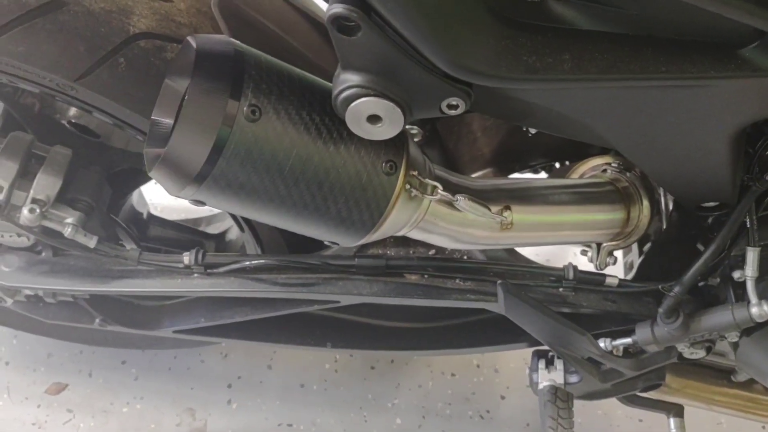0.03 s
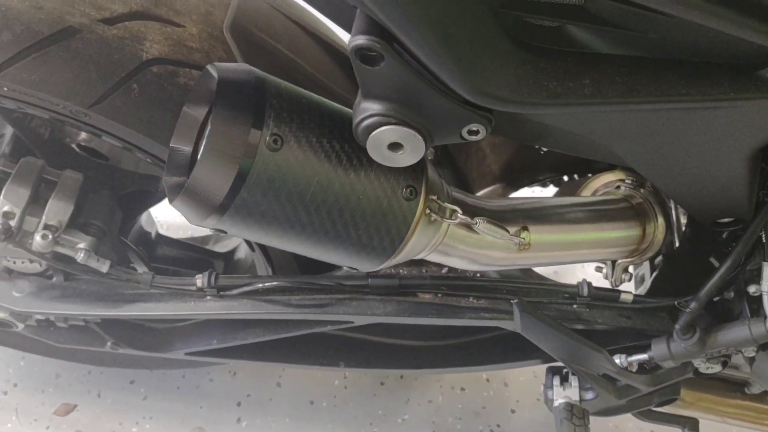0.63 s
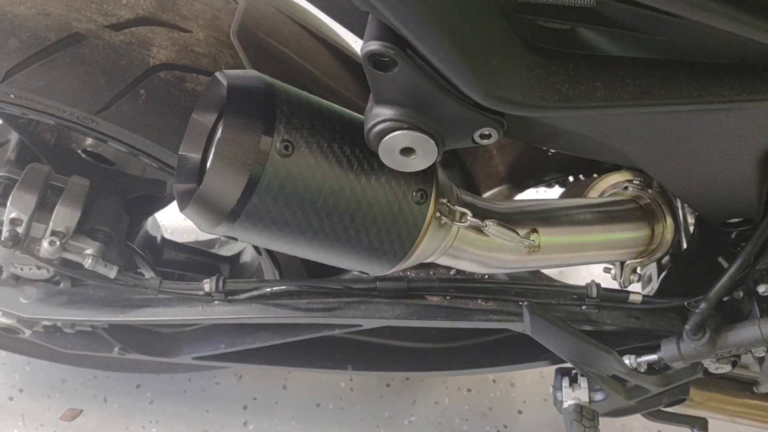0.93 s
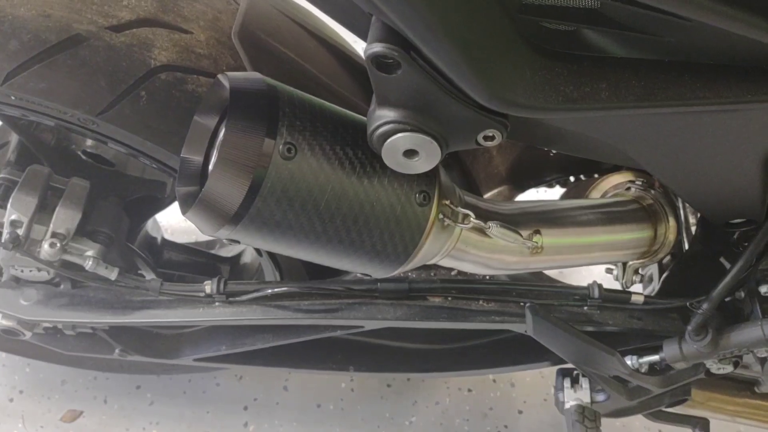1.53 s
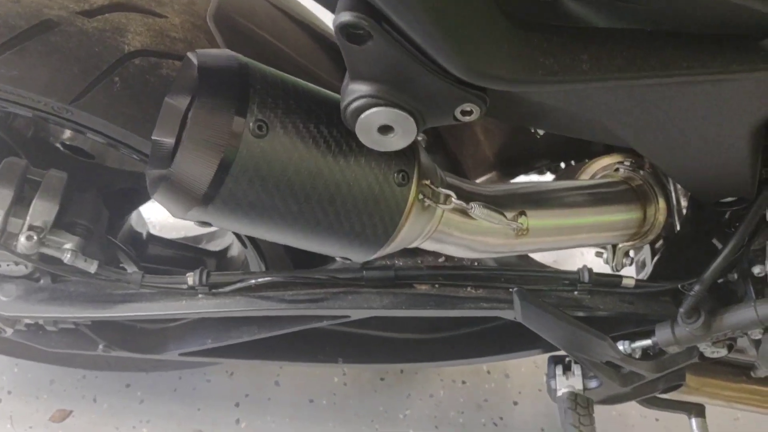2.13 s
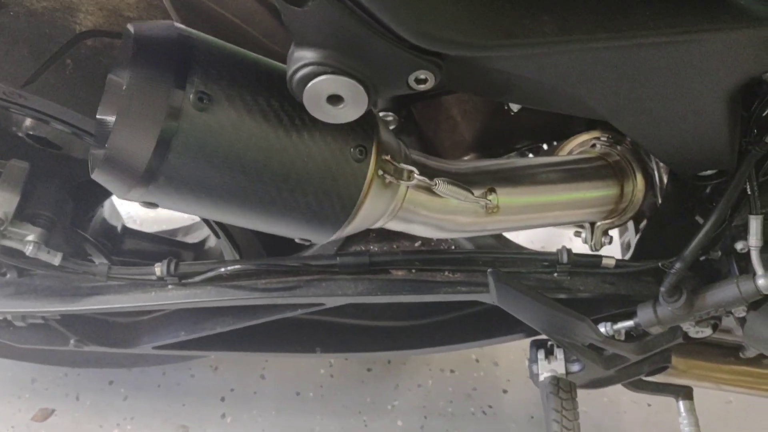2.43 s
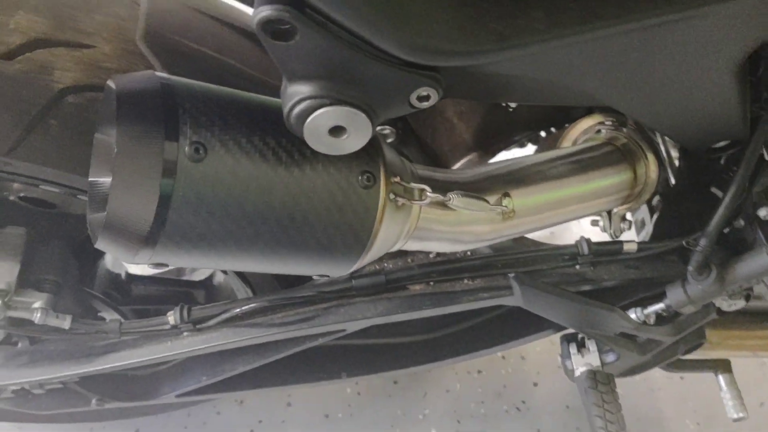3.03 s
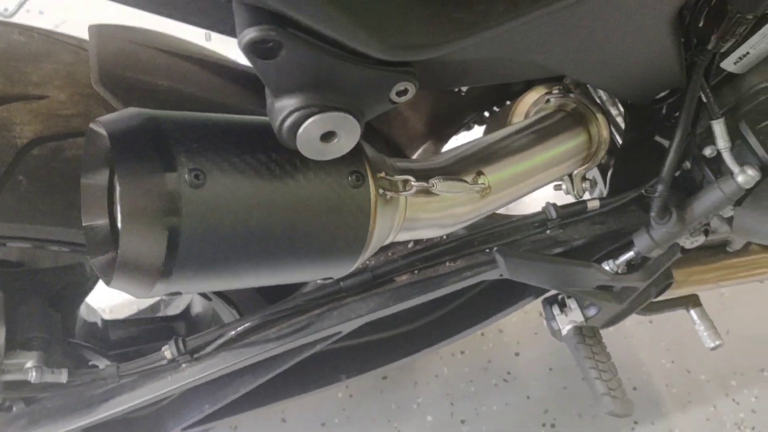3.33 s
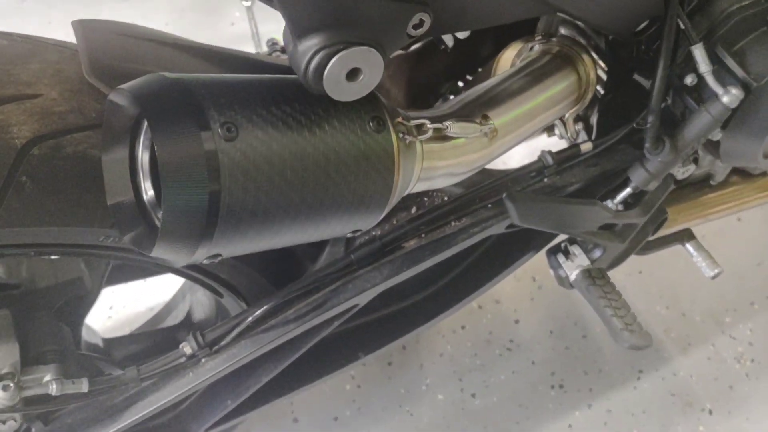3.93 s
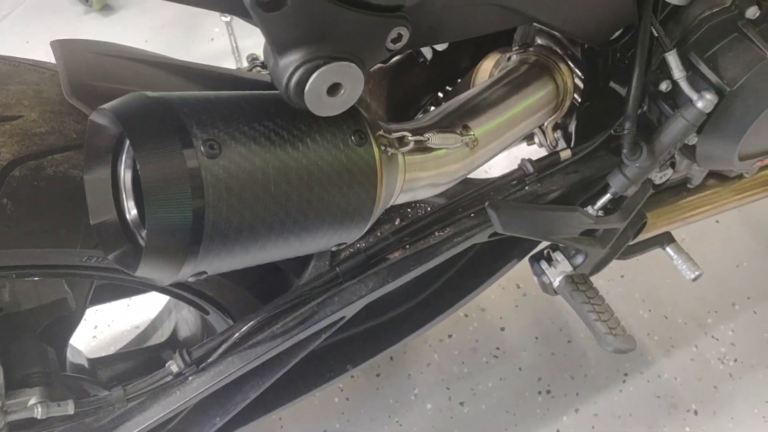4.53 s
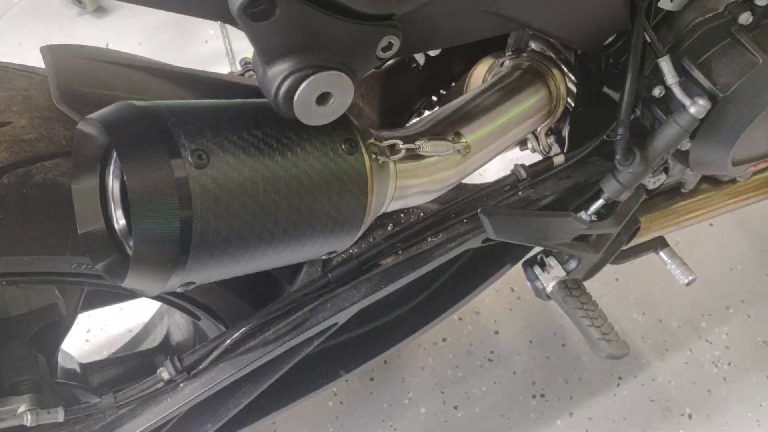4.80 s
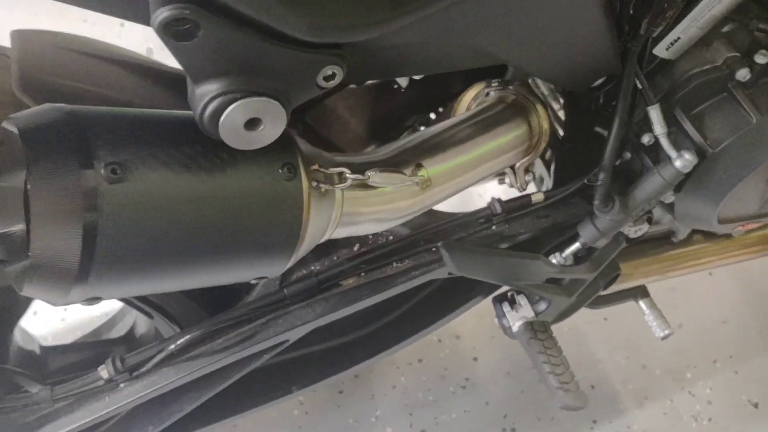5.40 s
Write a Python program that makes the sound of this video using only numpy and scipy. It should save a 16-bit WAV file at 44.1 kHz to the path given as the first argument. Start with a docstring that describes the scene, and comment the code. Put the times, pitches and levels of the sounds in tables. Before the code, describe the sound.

A twin-cylinder motorcycle idles in a garage with a low, uneven rumble, gets two quick throttle blips, then settles back.

```python
"""In a garage, a twin-cylinder motorcycle idles and gets two small throttle blips.
Unevenly spaced firings excite the modes of the exhaust pipe; revved, they crack and merge into a note.
Unburnt fuel pops, turbulent intake air rushes, and the moving parts hiss, tick, rattle and ping.
The walls reverberate. A close microphone swings from the engine towards the tip of the short
silencer and rounds off the loudest peaks."""
import sys
import numpy as np
from scipy import signal
from scipy.fft import rfft, irfft, next_fast_len
from scipy.io import wavfile
from scipy.ndimage import uniform_filter1d, map_coordinates

SR = 44100
rng = np.random.default_rng(int(sys.argv[2]) if len(sys.argv) > 2 else 0)


def bounce(signal):
    """Save signal as a 16-bit WAV file at the path given by the first command-line argument."""
    frames = np.transpose(np.atleast_2d(signal))
    limited = np.clip(frames, -1, 1)
    pcm = np.round(limited * 32767).astype(np.int16)
    wavfile.write(sys.argv[1], SR, pcm)


N = 245195
TIME = np.arange(N) / SR

# The band the silencer's chamber cancels. Each row: centre in Hz, width in Hz, share cancelled in dB.
CHAMBER_NOTCH = [(90.7, 16, -2)]


def amp(db):
    """Decibels as an amplitude ratio."""
    return 10 ** (np.asarray(db) / 20)


def unit(x):
    """Normalisation to rms 1."""
    return x / np.sqrt(np.mean(x ** 2) + 1e-20)


def steady(x):
    """Normalisation to rms 1 over a few engine cycles, which keeps the beat within them."""
    power = np.mean(np.atleast_2d(x) ** 2, axis=0)
    power = uniform_filter1d(uniform_filter1d(power, size=6100), size=3050)
    return x / np.sqrt(np.abs(power) + 1e-12)


def along(points, hz):
    """Interpolation of (Hz, value) points on a logarithmic frequency axis."""
    f, values = np.transpose(points)
    return np.interp(np.log(hz + 1), np.log(f + 1), values)


def filtered(x, response):
    """Linear filtering: the spectrum of x times a complex frequency response."""
    size = next_fast_len(N + SR // 2)
    return irfft(rfft(x, size) * response(np.fft.rfftfreq(size, 1 / SR)), size)[..., :N]


def coloured(x, spectrum):
    """Spectral shaping by (Hz, dB) points, at rms 1."""
    return unit(filtered(x, lambda f: amp(along(spectrum, f))))


def ring(x, modes):
    """Modal superposition: x drives damped resonators in parallel."""
    return filtered(x, lambda f: sum(
        amp(db) * 1j * f * width / (hz * hz - f * f + 1j * f * width) for hz, width, db in modes))


def fading(x, decay_s):
    """Exponential decay after every impulse of x."""
    return signal.lfilter([1], [1, -np.exp(-1 / (SR * decay_s))], x)


def lagged(x, lag_s):
    """First-order lag: x followed sluggishly."""
    return (1 - np.exp(-1 / (SR * lag_s))) * fading(x, lag_s)


def noise(alike):
    """Partly coherent stereo white noise: the sides share this fraction of their power."""
    return np.sqrt(alike) * rng.standard_normal(N) + np.sqrt(1 - alike) * rng.standard_normal((2, N))


def impulses(times, sizes):
    """An impulse train, with times in seconds."""
    inside = (times >= 0) & (times < (N - 1) / SR)
    return np.bincount((times[inside] * SR).astype(int), sizes[inside], N)


def patter(per_s):
    """A Poisson process: impulses of uneven size at random times."""
    return (rng.random(N) < per_s / SR) * (.5 + rng.random(N))


def garage(x):
    """Diffuse reverberation, different on each side; the close tip drowns it in the bass."""
    # Each row: frequency in Hz, time to decay by 60 dB in seconds.
    decay_times = [(100, 0.55), (500, 0.29), (3000, 0.11), (12000, 0.047)]
    wet_db = [(140, -25), (350, -20), (700, -10), (3000, -9), (12000, -14)]
    hz, t, spectra = signal.stft(rng.standard_normal((2, SR // 2)), SR, nperseg=256)
    tail = signal.istft(spectra * amp(-60 * t / along(decay_times, hz)[:, None]), SR, nperseg=256)[1]
    wet = signal.fftconvolve(x, tail / np.linalg.norm(tail[0]), axes=1)[:, :N]
    return filtered(wet, lambda f: amp(along(wet_db, f)))


def pings(hz=7400):
    """Free vibration: a loose metal part rings in one quickly damped mode."""
    # Each row: start in seconds, level in dB.
    strikes = [(5.028, -25), (5.516, -25)]
    times, db = np.transpose(strikes)
    return fading(impulses(times, amp(db)), decay_s=.016) * np.sin(2 * np.pi * hz * TIME)


def rattles(edge_s=.011):
    """Impact noise: slack chain and gears clatter as the engine runs down."""
    # Each row: start in seconds, length in seconds, level in dB.
    spells = [(0.815, 0.13, -23.5), (1.282, 0.136, -23.5)]
    # Each row: frequency in Hz, relative spectral density in dB.
    clatter_spectrum = [(1500, -40), (2600, -0.5), (3300, 9), (4500, 1.5), (6000, 2), (8200, 5),
                        (11000, -7), (15000, -26)]
    slack = sum(amp(db) * np.interp(TIME, [s - edge_s, s, s + span, s + span + edge_s], [0, 1, 1, 0])
                for s, span, db in spells)
    impacts = .23 + fading(patter(per_s=420), decay_s=.0043)
    return slack * coloured(impacts * noise(alike=.05), clatter_spectrum)


def intake(puff, load, level):
    """Turbulence: air rushes past the throttle in gulps, even at idle, and hisses at the open plate."""
    # Each row of both: frequency in Hz, relative spectral density in dB.
    rush_spectrum = [(80, -36), (300, -12), (700, -2.5), (1500, -4.5), (2300, -11), (4000, -25),
                     (8000, -18), (15000, -42)]
    plate_spectrum = [(1500, -35), (2700, -19), (3400, 0), (4300, 7), (5500, 2), (8000, -3), (14000, -18)]
    gulps = .23 + fading(puff, decay_s=.028)
    rush = steady(coloured(gulps * noise(alike=.038), rush_spectrum))
    hiss = np.tanh(10 * load) * coloured(noise(alike=.05), plate_spectrum)
    return level(-51.5, speed_db=16, load_db=29, turn_db=11) * rush + amp(-23) * hiss


def mechanics(puff, level):
    """Structure-borne sound: chain, gears and valves hiss, tick and ring the casing at each firing."""
    # Each row of both: frequency in Hz, relative spectral density in dB.
    hiss_spectrum = [(80, -8), (400, 12), (900, -7), (2000, -15), (2600, -10), (3100, 0.5), (3600, 2),
                     (5000, -4), (7200, -6), (9500, -11.5), (12500, -18), (16000, -75)]
    tick_spectrum = [(2000, -7.5), (3500, -75), (6000, -8.5), (9000, -1.5), (12500, -3.5), (15500, -3.5)]
    # Modes of metal parts, each loudest as the microphone passes it. Each row: centre in Hz,
    # width in Hz, relative gain in dB, time when nearest in seconds, half span in seconds.
    casing_modes = [(3680, 270, -6, 0.18, 0.63), (3900, 130, -8, 1.85, 0.16), (3220, 290, -2, 2.6, 0.18),
                    (3610, 50, -2, 3.62, 0.29), (3470, 100, 9, 4.1, 0.22), (3480, 130, 9.5, 4.85, 0.35),
                    (4440, 280, 1, 3.7, 1.3), (6950, 100, -3, 1.3, 1.1), (6480, 120, 0, 2.9, 0.4),
                    (7530, 130, -2, 3.6, 1.8), (6680, 90, 3, 4.5, 0.65), (7300, 60, 4, 4.7, 0.7),
                    (8070, 150, 3.5, 4.5, 0.6)]
    swell = 1 + fading(puff, decay_s=.0078)
    hiss = steady(coloured(swell * noise(alike=.072), hiss_spectrum))
    shake = steady(swell ** 2 * noise(alike=.03))
    casing = unit(sum(ring(shake, [(hz, width, db)]) / (1 + ((TIME - s) / half) ** 2)
                      for hz, width, db, s, half in casing_modes))
    # a double tick with a short tail, among stray valve ticks and a faint steady sizzle
    snap = fading(puff, decay_s=.0005)
    second_snap = np.roll(.75 * snap + .33 * fading(puff, decay_s=.018), round(.002 * SR))
    strays = .19 * fading(patter(per_s=110), decay_s=.0014)
    envelope = .7 * snap + second_snap + strays + .02
    ticks = steady(coloured(envelope * noise(alike=.033), tick_spectrum))
    return (level(-20, speed_db=4, load_db=-.5, turn_db=-6.5) * hiss
            + level(-32.5, speed_db=4, load_db=-9, turn_db=-6) * casing
            + level(-32.5, speed_db=6, load_db=-2, turn_db=0) * ticks)


def pops():
    """Impulsive combustion: unburnt fuel bangs in the silencer, mostly as the engine runs down."""
    # Each row: start in seconds, relative level in dB.
    bangs = [(0.902, -17), (1.031, -14), (1.444, -14), (1.494, -14), (5.028, -17)]
    # Each row: frequency in Hz, relative spectral density in dB.
    bang_spectrum = [(70, -12), (250, 2), (500, 1), (670, 0), (820, -9), (1080, -4), (1400, -20),
                     (2200, -45)]
    times, db = np.transpose(bangs)
    bursts = fading(impulses(times, amp(db)), decay_s=.0011) * noise(alike=.94)
    return amp(22) * filtered(bursts, lambda f: amp(along(bang_spectrum, f)))


def cracks():
    """Shock excitation: the first hard firings of a blip ring the tip and spray noise."""
    # Each row: start in seconds, relative level in dB.
    hard_firings = [(0.635, -21), (0.654, -19), (0.659, -21), (0.679, -12.5), (0.684, -15), (0.695, -14),
                    (0.712, -13.5), (0.718, -17), (0.73, -15.5), (1.175, -19)]
    # Each row: centre in Hz, width in Hz, relative gain in dB.
    tip_modes = [(640, 200, -7), (1060, 240, 0), (1650, 450, -8), (2350, 600, -13)]
    # Each row: frequency in Hz, relative spectral density in dB.
    spray_spectrum = [(300, -11), (650, 5), (820, 11.5), (1080, 19), (1400, -4.5), (3000, 7.5), (5000, -5),
                      (9000, -6), (15000, -15)]
    times, db = np.transpose(hard_firings)
    fronts = impulses(times, amp(db))
    spray = fading(fronts, decay_s=.004) * coloured(noise(alike=.51), spray_spectrum)
    return amp(33) * ring(fronts, tip_modes) + spray


def crank(open_s=.02, close_s=.0629, pull_rpm=8761.1, friction_rpm=543.4, fill_s=.012):
    """Inertia: the flywheel lags the throttle. Gives rpm, doublings of speed over idle, load 0-1."""
    # The idle hunts a little. Each row: time in seconds, crank speed in rpm.
    idle_speeds = [(0.0, 1925.0), (0.3, 1933.0), (0.55, 1699.0), (1.1, 1795.0), (1.75, 1885.0),
                   (1.9, 1932.0), (2.05, 1759.0), (2.25, 1763.0), (2.5, 1801.0), (2.8, 1736.0),
                   (3.65, 1731.0), (3.95, 1652.0), (4.35, 1704.0), (4.7, 1714.0), (4.9, 1767.0),
                   (5.1, 1700.0), (5.3, 1736.0), (5.56, 1632.0)]
    # Each row: start in seconds, time until closing in seconds, throttle opening from 0 to 1.
    blips = [(.567, .1506, .876), (1.105, .1081, .571)]
    throttle = sum(np.interp(TIME, [s, s + open_s, s + held, s + held + close_s], [0, 1, 1, 0]) * opening
                   for s, held, opening in blips)
    idle = np.interp(TIME, *np.transpose(idle_speeds))
    rpm = idle + np.maximum(pull_rpm * lagged(throttle, lag_s=.3354) - friction_rpm, 0)
    # the cylinders fill a moment late; a small opening loads them little
    load = lagged(lagged(throttle, fill_s), fill_s) ** 3.2
    return rpm, np.log2(rpm / idle), load


def fast_flow(rpm):
    """Gas flow rises with crank speed: 0 around idle, at most 1."""
    return np.clip(rpm / 1900 - 1, 0, 1)


def merged(doublings):
    """Fusion of pulses into pitch: how far the firings form one note, 0-1."""
    return np.clip(doublings / .65, 0, 1)


def stumbles():
    """Amplitude modulation in dB: the exhaust dips as firings fail with the throttle shut."""
    # Each row: centre in seconds, half length in seconds, dip in dB.
    dips = [(0.798, 0.096, -5.5), (0.973, 0.029, -7), (1.41, 0.0076, -8), (1.485, 0.063, -1.5)]
    return sum(db * np.exp(-((TIME - s) / half) ** 2) for s, half, db in dips)


def firings(rpm, jitter_s=.00007, echo_s=.0137):
    """Quasi-periodic excitation: the crank times pressure blasts, their echoes and gas puffs."""
    # One cycle of two crank turns. Each row: angle in degrees, strength in dB, relative echo in dB.
    firing_order = [(0, -1.5, -1.5), (281.6, -1.5, -1.5)]
    degrees, strength_db, echo_db = np.transpose(firing_order)
    cycles = .1 + np.cumsum(rpm / 120) / SR
    due = np.arange(int(cycles[-1]) + 1)[:, None] + degrees / 720
    time_scatter, size_scatter, puff_scatter = rng.standard_normal((3,) + due.shape)
    times = np.interp(due, cycles, TIME, left=-1, right=-1) + jitter_s * time_scatter
    revved = np.interp(due, cycles, fast_flow(rpm))
    size_db = strength_db + (.45 + .1 * revved) * size_scatter
    blast = impulses(times, amp(size_db))
    # each blast runs back up the pipe and comes out once more; fast flow damps that echo
    echo = impulses(times + echo_s, amp(size_db + echo_db) * np.exp(-4 * revved))
    puff = impulses(times, amp(size_db + 3.2 * np.tanh(puff_scatter))) + .22 * echo
    return blast, echo, puff


def outflow(push, rpm, valve_hz=345, radiation_hz=70):
    """Radiation from an open pipe: each push leaves with a turbulent wake that grows with speed."""
    turbulence = .003 + .006 * fast_flow(rpm)
    flow = push + turbulence * fading(push, decay_s=.05) * rng.standard_normal(N)
    # the valve opens gradually, and the tip radiates little deep bass
    valve = lambda f: 1 / (1 + 1.25j * f / valve_hz - (f / valve_hz) ** 2) ** 2
    flow = filtered(flow, lambda f: valve(f) * 1j * f / (radiation_hz + 1j * f))
    return flow - ring(flow, CHAMBER_NOTCH)


def drone(rpm, doublings, load, rough_db=1.3, sway_radians=.14):
    """Source and filter: harmonics of the revved engine sing as they cross the pipe's resonances."""
    # Each row: multiple of the cycle rate, relative level in dB.
    harmonics = [(5, 0), (6, -8), (7, -11), (8, -14), (10, -17), (13, -12), (15, -13), (18, -14)]
    # Each row: centre in Hz, width in Hz, gain in dB.
    pipe_modes = [(139, 26, 0), (174, 24, -4), (280, 80, -3), (468, 36, 2), (555, 60, -3)]
    cycles = np.cumsum(rpm / 120) / SR
    per_firing = lambda: map_coordinates(rng.standard_normal(N // 100), [2 * cycles])
    note = np.zeros(N)
    for multiple, db in harmonics:
        size = np.sqrt(2) * amp(db + rough_db * np.tanh(per_firing()))
        note += size * np.sin(2 * np.pi * multiple * cycles + sway_radians * per_firing())
    strength = merged(doublings) * amp(-11 - 5 * load + stumbles())
    sung = ring(strength * note, pipe_modes)
    return sung - ring(sung, CHAMBER_NOTCH)


def exhaust(blast, echo, puff, rpm, doublings, level, build_up_s=.0033):
    """Forced resonance: blasts and echoes ring the pipe and the can, knock the tip and rasp out of it."""
    # Each row of these five: centre in Hz, width in Hz, relative gain in dB.
    low_modes = [(53.5, 8, -10), (118.5, 10, 5.5), (140, 9.5, 7.3), (182, 12, 3), (223, 31, -4),
                 (296, 42, 0)]
    middle_modes = [(352, 16, -9), (408, 16, 0), (456, 22, -8)]
    upper_modes = [(468, 25, 1), (530.2, 8.2, -3), (658, 52, -5.5)]
    can_modes = [(358, 26, 0)]
    tip_modes = [(624, 160, 0), (1100, 140, -15)]
    # Each row: frequency in Hz, relative spectral density in dB.
    rasp_spectrum = [(70, -5), (250, 11.5), (500, -13), (670, -13), (820, -12), (1080, -9), (1400, -28),
                     (2200, -60), (4000, -74), (9000, -43)]
    flow = outflow(blast + echo, rpm)
    boom = ring(flow, low_modes)
    # the engine is already running: the pipe still booms from the cycle before
    boom = np.where(np.cumsum(blast) > 0, boom, np.roll(boom, -round(SR * 120 / rpm[0])))
    boom = steady(boom) * amp(-6.5 * merged(doublings))  # gives way to the drone
    # bark and hollow ring build up a moment after the boom
    late = lambda x: filtered(x, lambda f: np.exp(-2j * np.pi * f * build_up_s))
    bark = steady(late(ring(flow, middle_modes)))
    hollow = steady(late(ring(outflow(echo, rpm), can_modes)))
    blare = steady(ring(flow, upper_modes))
    knock = steady(ring(ring(blast + .45 * echo, tip_modes), tip_modes))
    jet = (fading(puff, decay_s=.004) + .15) * noise(alike=.8)
    rasp = steady(coloured(jet, rasp_spectrum))
    return amp(stumbles()) * (
        level(-11.7, speed_db=-4, load_db=-6.5, turn_db=-.5) * boom
        + level(-27.5, speed_db=-8, load_db=-20, turn_db=8) * bark
        + level(-40.5, speed_db=5, load_db=-13, turn_db=16.5) * hollow
        + level(-26, speed_db=1, load_db=1, turn_db=-23) * blare
        + level(-38.5, speed_db=-2, load_db=13, turn_db=-.5) * knock
        + level(-25.5, speed_db=18.5, load_db=-10.5, turn_db=2) * rasp)


def scene(left_lead_s=.000225, turn_pan_db=-2.5):
    """Superposition: engine and room reach two microphone ports, unequal in level and arrival time."""
    # The microphone's swing. Each row: time in seconds, turn from 0 (engine) to 1 (silencer's tip).
    swing = [(0, 0), (1.8, 0.03), (3.2, 0.13), (4.1, 0.55), (4.7, 0.93), (5.56, 0.81)]
    # Each row: frequency in Hz, left minus right in dB.
    balance = [(150, -1.5), (500, -1.7), (1000, 2), (3000, -3.5), (5000, -4), (8000, -3), (12000, 4.5),
               (16000, 7.5)]
    rpm, doublings, load = crank()
    turn = np.interp(TIME, *np.transpose(swing))
    revved = np.minimum(doublings, .55)  # speed changes the layers' levels only up to here

    def level(idle_db, speed_db, load_db, turn_db):
        """Gains add in dB: at idle, per doubling of speed, at full load and fully turned."""
        return amp(idle_db + speed_db * revved + load_db * load + turn_db * turn)

    blast, echo, puff = firings(rpm)
    pipe = exhaust(blast, echo, puff, rpm, doublings, level) + drone(rpm, doublings, load)
    bike = pipe + pops() + cracks() + mechanics(puff, level) + rattles() + pings()
    bike += intake(puff, load, level)
    sides = np.array([[.5], [-.5]])
    heard = (bike + garage(bike)) * amp(sides * turn_pan_db * turn)
    arrival = lambda f: np.exp(2j * np.pi * f * sides * left_lead_s)
    return filtered(heard, lambda f: amp(sides * along(balance, f)) * arrival(f))


def record(dry, ceiling=.9, top_hz=15750):
    """Soft saturation: the microphone rounds off the peaks and keeps nothing above its band limit."""
    rounded = dry / (1 + np.abs(dry / ceiling) ** 5) ** (1 / 5)
    return filtered(rounded, lambda f: f < top_hz)


dry = scene()
out = record(dry)
bounce(out)
```